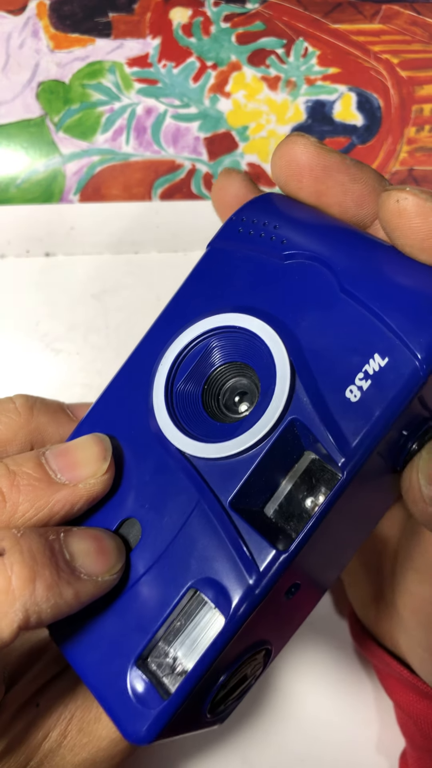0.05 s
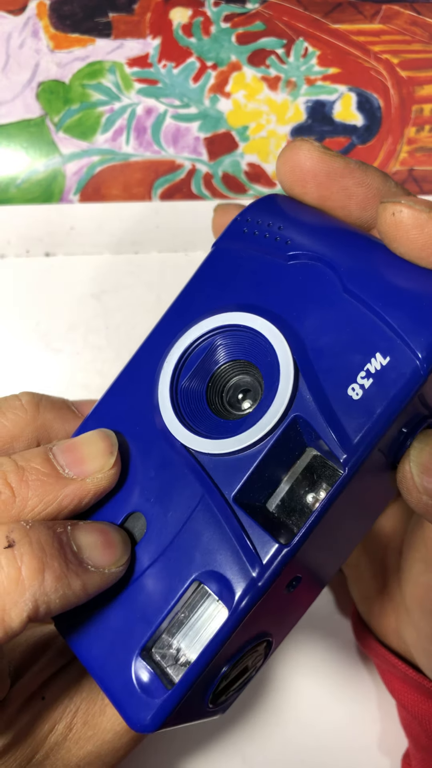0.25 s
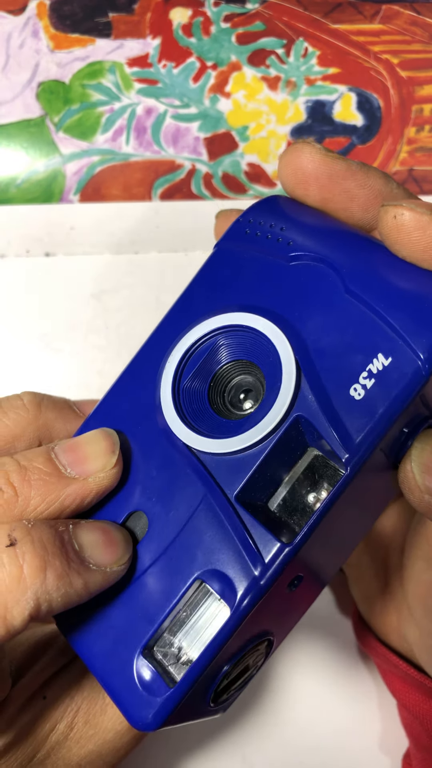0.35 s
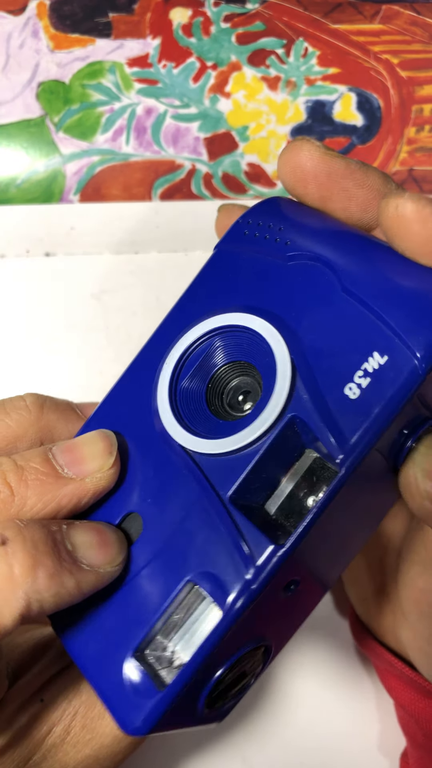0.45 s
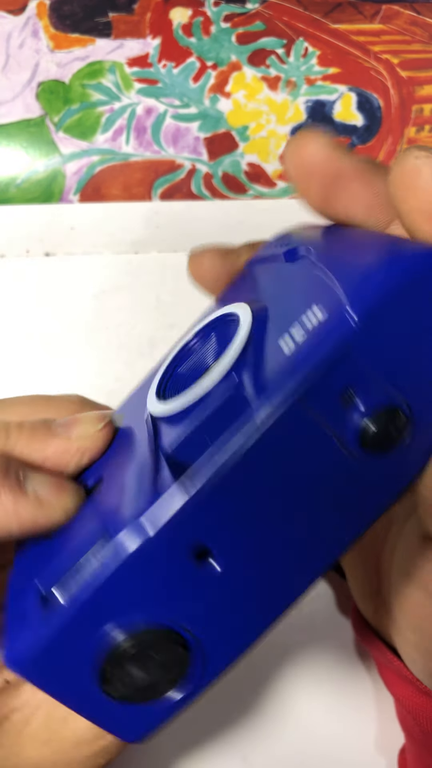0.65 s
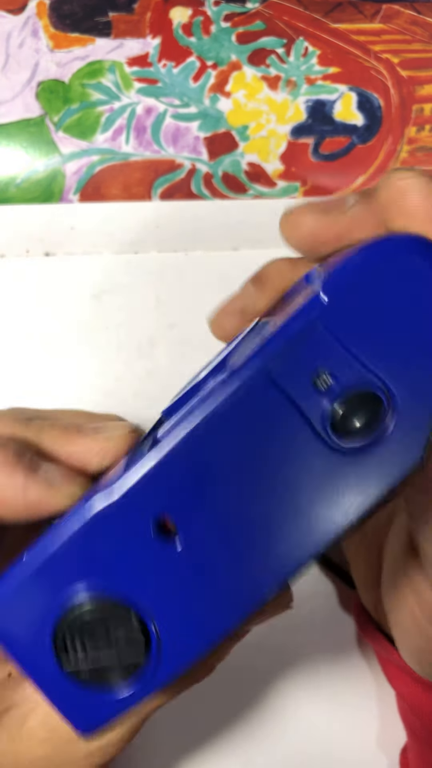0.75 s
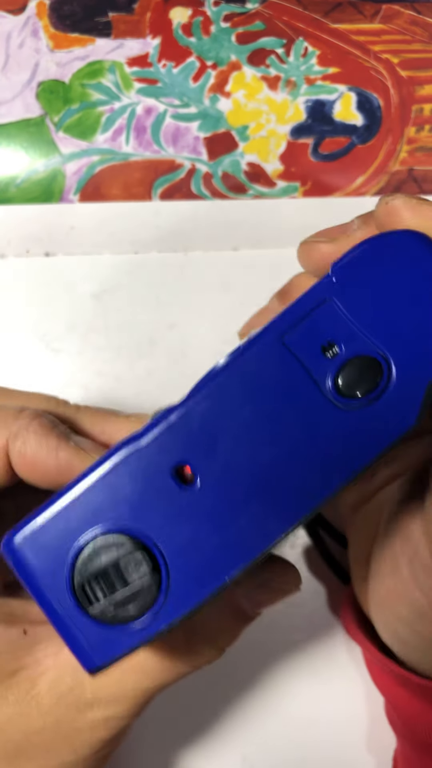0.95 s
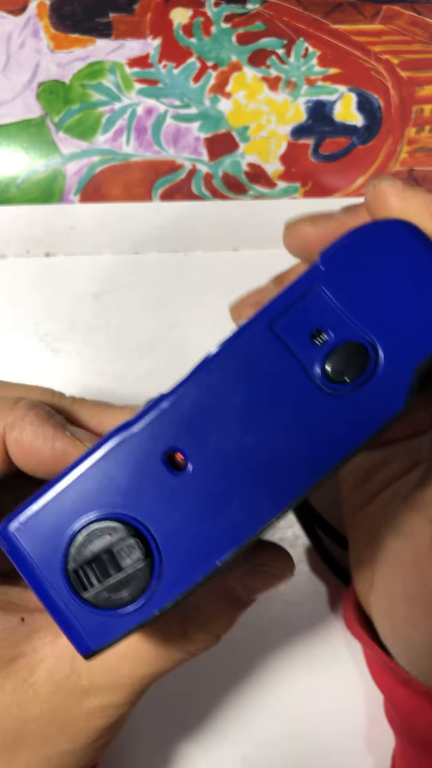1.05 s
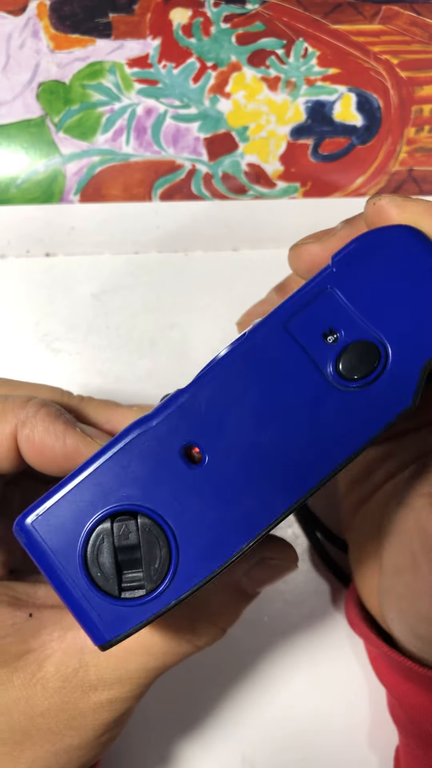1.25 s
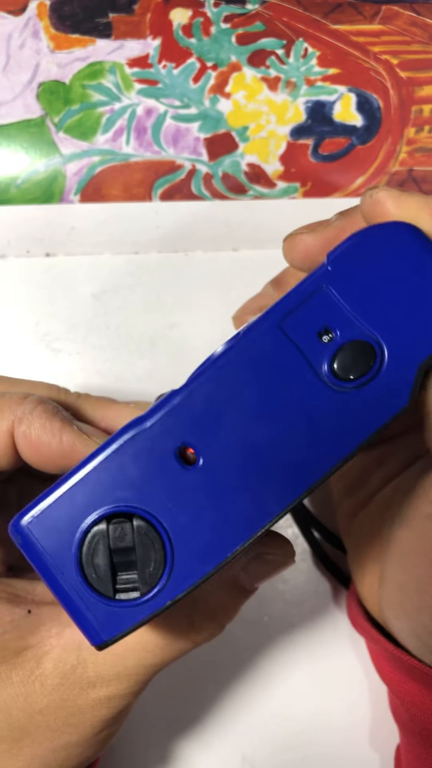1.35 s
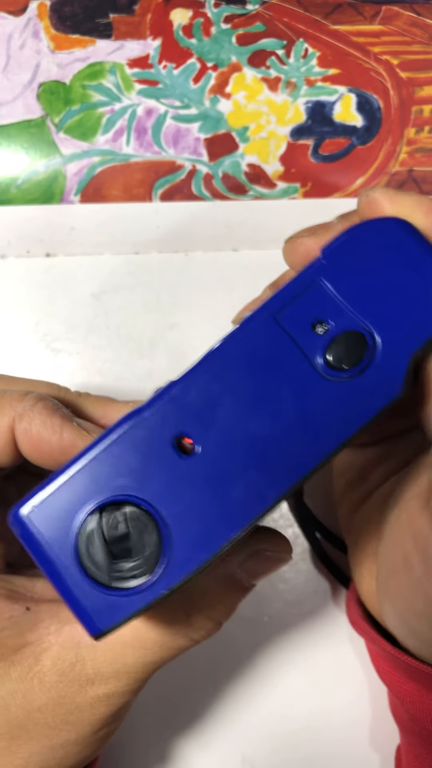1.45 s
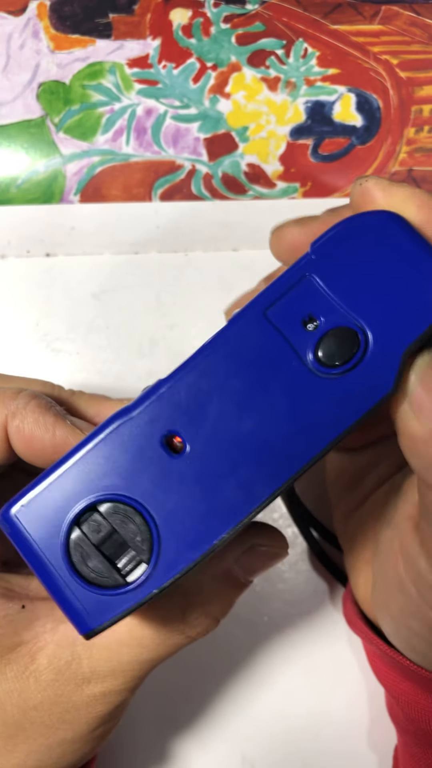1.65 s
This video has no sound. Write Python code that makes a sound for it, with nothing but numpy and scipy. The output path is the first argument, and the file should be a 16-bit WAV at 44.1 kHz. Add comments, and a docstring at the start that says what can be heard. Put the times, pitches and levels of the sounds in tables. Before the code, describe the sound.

A small plastic film camera's shutter snaps sharply at about 0.2 seconds, close by in a quiet room. Fingers rub and tap the case, with a hollow knock near 0.7 seconds. The winding wheel then ratchets in short bursts of dry clicks at about 0.85, 1.15 and 1.45 seconds, with a few more near 1.7. A faint low electrical hum lies underneath.

```python
"""The shutter of a small plastic film camera snaps once, close by in a quiet room.
Each blow of the mechanism is a brief force that excites the resonances of its parts and hollow shell.
The body is turned over with taps, knocks and the friction noise of fingers, and the winding wheel
is pushed in short strokes, a pawl clicking over its teeth. A low mains hum lies underneath."""
import sys
import numpy as np
from scipy import signal
from scipy.fft import rfft, irfft, next_fast_len
from scipy.io import wavfile
from scipy.ndimage import uniform_filter1d, map_coordinates

SR = 44100
rng = np.random.default_rng(int(sys.argv[2]) if len(sys.argv) > 2 else 0)


def digitize_waveform(pressure):
    """Quantize a signal to 16-bit integers and store it at the path in sys.argv[1].

    Rows of a 2-D input are taken as channels; values are limited to [-1, 1].
    """
    field = np.atleast_2d(pressure).T
    bounded = np.clip(field, -1, 1)
    quanta = np.round(bounded * 32767).astype(np.int16)
    wavfile.write(sys.argv[1], SR, quanta)


N = 74970

# spectrum of the room noise: frequency_hz, gain_db
FLOOR_SPECTRUM = [(22, -28), (42, -12.5), (220, -4), (330, -10), (1200, -24), (3000, -42.5), (16000, -40.5)]
# wavering level of the hum: time_s, level_db
HUM_LEVELS = [(0, -59.5), (.32, -62), (.38, -50.5), (.46, -49.5), (.55, -60.5), (1.05, -59.5), (1.2, -52),
              (1.7, -63.5)]
# reverberation time of the room: frequency_hz, t60_s
ROOM_DECAY = [(1200, 0.26), (6000, 0.17), (15000, 0.16)]
# smooth slides of skin: start_s, end_s, level_db
SKIN_SLIDES = [(0.486, 0.714, -57), (0.969, 1.043, -53.5)]
# spectrum of a slide: frequency_hz, gain_db
SLIDE_SPECTRUM = [(500, -20), (3000, 5), (15000, -5)]
# fingers rubbing the plastic: time_s, level_db
RUB_LEVELS = [(.1, -62.5), (.12, -50), (.2, -54), (.36, -66), (.43, -54.5), (.55, -49), (.6, -55.5),
              (.65, -47.5), (.7, -57), (.96, -58.5), (1.22, -49), (1.31, -66), (1.39, -52.5), (1.53, -61.5),
              (1.7, -50)]
# spectrum of the rubbing: frequency_hz, gain_db
RUB_SPECTRUM = [(300, -32), (700, -0.5), (1450, 5), (2700, -2.5), (4200, -7.5), (15000, -23.5)]
# loose parts tick against the case: start_s, level_db, pitch_hz, shell_db
CASE_TAPS = [(0.1826, -47, 8300, -55), (0.42, -51, 7560, -54), (0.4523, -41, 3680, -48),
             (0.473, -46.5, 3650, -48.5), (0.4925, -46.5, 3240, -46), (0.497, -43, 2380, -43),
             (0.5358, -45.5, 2200, -50), (0.7905, -48, 2630, -46.5), (0.8055, -42.5, 3650, -42),
             (1.073, -50, 4500, -39), (1.0863, -49.5, 2790, -49), (1.3481, -44.5, 4520, -47),
             (1.368, -42.5, 3910, -41.5), (1.3976, -44, 2730, -50), (1.5601, -49.5, 4450, -39.5)]
# the hollow shell knocks in the grip: start_s, level_db, pitch_hz
SHELL_KNOCKS = [(0.7146, -34, 1363), (0.717, -27, 1260), (0.73, -33, 1307), (0.7574, -40, 1120),
                (1.265, -44.5, 1380), (1.443, -31.5, 1377), (1.6299, -43, 1460)]
# the case shifts in the grip with a dull thud: start_s, level_db
GRIP_THUDS = [(.912, -42.5), (1.314, -50), (1.4575, -34.5)]
# the pawl drops off a tooth of the wheel: start_s, click_db, wheel_db, wheel_hz, spring_db
PAWL_DROPS = [(0.8287, -29.5, -29, 2610, -54), (0.849, -30, -34, 2450, -51),
              (0.8586, -36, -34.5, 2330, -38), (0.866, -37, -34, 2490, -43), (0.873, -29, -41, 2190, -46),
              (0.8798, -31, -35, 2130, -46), (0.8924, -31.5, -37, 2480, -28.5),
              (1.1289, -30.5, -35.5, 2650, -55), (1.1512, -30.5, -47, 2400, -30),
              (1.162, -28.5, -35, 2480, -27), (1.1695, -31, -35.5, 1820, -32),
              (1.1778, -30.5, -35, 2270, -42), (1.1843, -33, -30, 2420, -50), (1.1978, -34, -41, 2330, -40),
              (1.2068, -26.5, -32, 2840, -41), (1.4278, -28.5, -47, 2350, -29.5),
              (1.4358, -30, -44, 2080, -54), (1.4422, -25, -34.5, 2083, -39), (1.4496, -27, -38, 2510, -47),
              (1.462, -35, -41, 2390, -43), (1.658, -35.5, -42, 3050, -38),
              (1.678, -31.5, -39.5, 2700, -55), (1.6914, -32, -42, 2700, -43)]
# blows of the shutter: start_s, level_db, tilt_db_per_octave, shell_db
SHUTTER_BLOWS = [(.2284, -15.5, -2.4, -27), (.2327, -14, -1.1, -29), (.2416, -16, 5, -32),
                 (.2469, -24.5, 1.3, -40)]
# resonances of the hollow shell: centre_hz, width_hz, gain_db
SHELL_RESONANCES = [(1409, 140, 10.5), (1763, 1300, -4)]
# resonances of the case under a tick: centre_hz, width_hz, gain_db
CASE_RESONANCES = [(2200, 2300, -6), (4400, 620, -10), (6870, 1600, -10.5)]
# resonances of the case under a thud: centre_hz, width_hz, gain_db
THUD_RESONANCES = [(730, 240, 9.5), (1390, 930, -4.5)]
# resonances of the pawl: centre_hz, width_hz, gain_db
PAWL_RESONANCES = [(3400, 2700, -3.5), (4400, 250, 2), (6950, 1530, 0), (10600, 1070, -4), (13400, 400, 5),
                   (14150, 550, 3)]
# resonances of the shutter parts: centre_hz, width_hz, gain_db
SHUTTER_RESONANCES = [(2400, 251, -14.5), (3020, 920, -7), (4390, 330, 6), (5670, 250, 3), (7300, 780, 4),
                      (7900, 500, -4), (8550, 580, 2.5), (9730, 450, -4.5), (11870, 1300, -2),
                      (14430, 710, -3.5)]

PITCH_SCATTER = .022  # fraction by which the grip detunes a resonance


def amp(db):
    return 10 ** (np.asarray(db) / 20)


def unit(x):
    return x / np.sqrt(np.mean(x ** 2) + 1e-20)


def unit_burst(x):
    """Energy normalisation: the energy of 5 ms at rms 1."""
    return x / np.linalg.norm(x) * np.sqrt(.005 * SR)


def along(points, hz):
    """Interpolation of (frequency_hz, value) points on a logarithmic axis."""
    f, v = np.transpose(points)
    return np.interp(np.log(hz + 1), np.log(f + 1), v)


def curve(rows):
    """Linear interpolation of (time_s, value) rows at every sample."""
    return np.interp(np.arange(N) / SR, *np.transpose(rows))


def filtered(x, response):
    """Linear filtering: the spectrum is multiplied by a frequency response."""
    size = next_fast_len(len(x) + 8192)
    return irfft(rfft(x, size) * response(np.fft.rfftfreq(size, 1 / SR)), size)[:len(x)]


def coloured(x, spectrum):
    """Spectral shaping by (frequency_hz, gain_db) points, scaled to rms 1."""
    return unit(filtered(x, lambda hz: amp(along(spectrum, hz))))


def add(track, start_s, sound):
    """Superposition of a sound on the track."""
    part = track[int(start_s * SR):][:len(sound)]
    part += sound[:len(part)]


def ring(modes, tilt_db, low_hz, attack_s, hold_s, pivot_hz=6070, size=4096):
    """Source and filter: surfaces chatter for hold_s and settle, driving a set of resonances."""
    t, hz = np.arange(size) / SR, np.fft.rfftfreq(size, 1 / SR) + 1
    power = sum(amp(db) ** 2 / (1 + (2 * (hz - centre) / width) ** 2) for centre, width, db in modes)
    tilt = amp(tilt_db * np.log2(np.maximum(hz, low_hz) / pivot_hz))  # tilt_db is per octave
    gain = np.sqrt(power / (1 + (low_hz / hz) ** 8)) * tilt
    # minimum phase: the ringing follows the blow
    cepstrum = irfft(np.log(gain + 1e-6))
    cepstrum[1:size // 2] *= 2
    cepstrum[size // 2 + 1:] = 0
    envelope = (1 - np.exp(-t / attack_s)) / np.sqrt(1 + (t / hold_s) ** 5)
    chatter = rng.standard_normal(size) * envelope
    for _ in range(3):  # flatten the spectrum, then restore the envelope
        spectrum = rfft(chatter)
        band_power = np.abs(uniform_filter1d(np.abs(spectrum) ** 2, size=21))
        white = irfft(spectrum / np.sqrt(band_power + 1e-12))
        local_power = np.abs(uniform_filter1d(white ** 2, size=25))
        chatter = white * envelope / np.sqrt(local_power + 1e-16)
    return unit_burst(irfft(rfft(chatter) * np.exp(rfft(cepstrum))))


def contact(modes, tilt_db, low_hz, attack_s, hold_s, scatter_db=3):
    """Modal scatter: no two contacts excite the resonances at quite the same pitch and strength."""
    draws = rng.standard_normal((len(modes), 2))
    varied = [(hz * (1 + PITCH_SCATTER * detune), width, db + scatter_db * boost)
              for (hz, width, db), (detune, boost) in zip(modes, draws)]
    return ring(varied, tilt_db, low_hz, attack_s, hold_s)


def tone(hz, rise_s, t60_s):
    """Damped free vibration: three close modes swell and decay together."""
    t = np.arange(SR // 10) / SR
    pitches = hz * (1 + PITCH_SCATTER * (np.array([-1, 0, 1]) + rng.standard_normal(3) / 2))
    cycles = np.outer(t, pitches) + rng.random(3) / 2
    envelope = (1 - np.exp(-(t / rise_s) ** 2)) * amp(-60 * t / t60_s)
    return unit_burst(np.sin(2 * np.pi * cycles).sum(axis=1) * envelope)


def room(x, wet_db, blur_hz=320, build_s=.00126):
    """Reverberation: the direct sound is followed by the short tail of a furnished room."""
    hz, t, noise = signal.stft(rng.standard_normal(SR // 3), SR, nperseg=256)
    decay = amp(-60 * t / along(ROOM_DECAY, hz)[:, None])
    tail = signal.istft(noise * decay, SR, nperseg=256)[1]
    tail *= 1 - np.exp(-np.arange(len(tail)) / SR / build_s)
    # random modulation blurs the resonances in the tail
    blur = unit(filtered(rng.standard_normal(N), lambda hz: hz < blur_hz))
    blurred = x * unit(np.tanh(2 * blur))
    return x + amp(wet_db) * signal.fftconvolve(blurred, tail / np.linalg.norm(tail))[:N]


def background(hum_hz=120.6, octave_db=-15.5, floor_db=-55.5):
    """Mains hum, a fundamental and its second harmonic, over broadband room noise."""
    phase = 2 * np.pi * hum_hz * np.arange(N) / SR
    hum = amp(curve(HUM_LEVELS)) * unit(np.sin(phase) + amp(octave_db) * np.sin(2 * phase))
    return hum + amp(floor_db) * coloured(rng.standard_normal(N), FLOOR_SPECTRUM)


def sliding(fade_s=.02):
    """Sliding friction: dry skin glides over the smooth case with an even hiss."""
    t = np.arange(N) / SR
    level = sum(amp(db) * np.clip(np.minimum(t - start, end - t) / fade_s, 0, 1)
                for start, end, db in SKIN_SLIDES)
    return level * coloured(rng.standard_normal(N), SLIDE_SPECTRUM)


def rubbing(grain_db=4, grains_per_s=500):
    """Stick-slip friction: skin catches and slips on the plastic in fine grains."""
    roughness = np.clip(rng.standard_normal(2 * N), -2, 2)
    position = np.arange(N) * grains_per_s / SR
    grains = amp(grain_db * map_coordinates(roughness, [position], order=1))
    return amp(curve(RUB_LEVELS)) * coloured(grains * rng.standard_normal(N), RUB_SPECTRUM)


def shell():
    """Body resonance: the hollow housing answers a click with its low modes."""
    return contact(SHELL_RESONANCES, tilt_db=0, low_hz=560, attack_s=.00052, hold_s=.0047)


def knock(hz, rise_s, t60_s, crack_db, tilt_db):
    """Impact: a struck part rings at its natural frequency, with a dry crack of the case."""
    sound = tone(hz, rise_s, t60_s)
    crack = contact(CASE_RESONANCES, tilt_db, low_hz=1100, attack_s=.0003, hold_s=.0022)
    add(sound, 0, amp(crack_db) * crack)
    return sound


def handling(firm_tap_db=-41):
    """Structure-borne sound: the case ticks, knocks and thuds as it is turned in the hands."""
    track = np.zeros(N)
    for start, db, hz, shell_db in CASE_TAPS:
        tilt_db = .5 * (db - firm_tap_db)  # a softer tap is duller
        add(track, start, amp(db) * knock(hz, rise_s=.00096, t60_s=.01, crack_db=1, tilt_db=tilt_db))
        add(track, start, amp(shell_db) * shell())
    for start, db, hz in SHELL_KNOCKS:
        add(track, start, amp(db) * knock(hz, rise_s=.00061, t60_s=.018, crack_db=-8.5, tilt_db=-5))
    for start, db in GRIP_THUDS:
        thud = ring(THUD_RESONANCES, tilt_db=0, low_hz=474, attack_s=.00049, hold_s=.0039)
        add(track, start, amp(db) * thud)
    return room(track, wet_db=-19.5)


def winding(spring_hz=6880):
    """Ratchet action: at each tooth the pawl scrapes, its spring pings, and wheel and shell ring."""
    track = np.zeros(N)
    for start, click_db, wheel_db, wheel_hz, spring_db in PAWL_DROPS:
        ping_hz = spring_hz * (1 + PITCH_SCATTER * rng.standard_normal())
        click = contact(PAWL_RESONANCES, tilt_db=0, low_hz=633, attack_s=.0002, hold_s=.003)
        add(track, start, amp(click_db) * click)
        add(track, start, amp(spring_db) * tone(ping_hz, rise_s=.00063, t60_s=.01))
        add(track, start, amp(wheel_db) * tone(wheel_hz, rise_s=.001, t60_s=.017))
        add(track, start, amp(wheel_db - 6) * shell())
    return room(track, wet_db=-16)


def shutter():
    """Impulsive excitation: the spring lets go, the blade hits its stop, closes and rebounds."""
    track = np.zeros(N)
    for start, db, tilt_db, shell_db in SHUTTER_BLOWS:
        click = contact(SHUTTER_RESONANCES, tilt_db, low_hz=667, attack_s=.0004, hold_s=.0024)
        add(track, start, amp(db) * click + amp(shell_db) * shell())
    return room(track, wet_db=-15)


def scene():
    """Superposition: the pressures of all sources add in one channel."""
    return (shutter() + winding() + handling() + rubbing() + sliding() + background())[None]


def record(dry):
    """Band limiting: a steep low-pass filter removes the highest treble."""
    cutoff_hz = 15850
    return np.array([filtered(x, lambda hz: 1 / np.sqrt(1 + (hz / cutoff_hz) ** 160)) for x in dry])


dry = scene()
out = record(dry)
digitize_waveform(out)
```